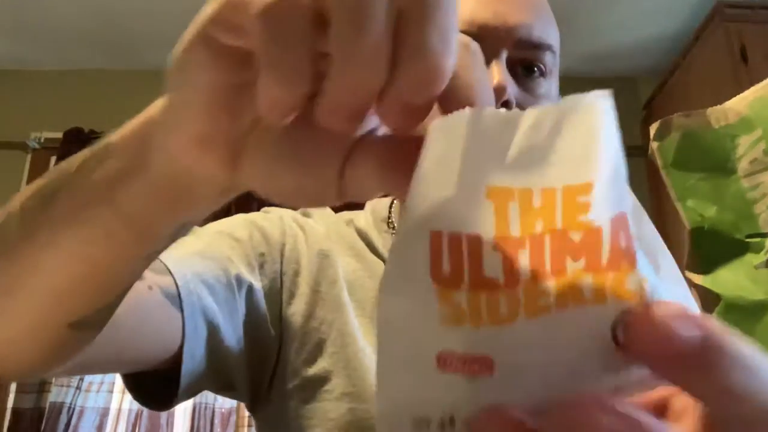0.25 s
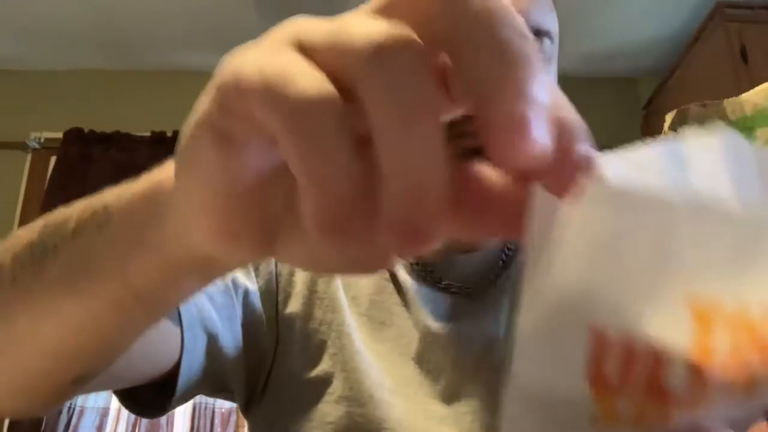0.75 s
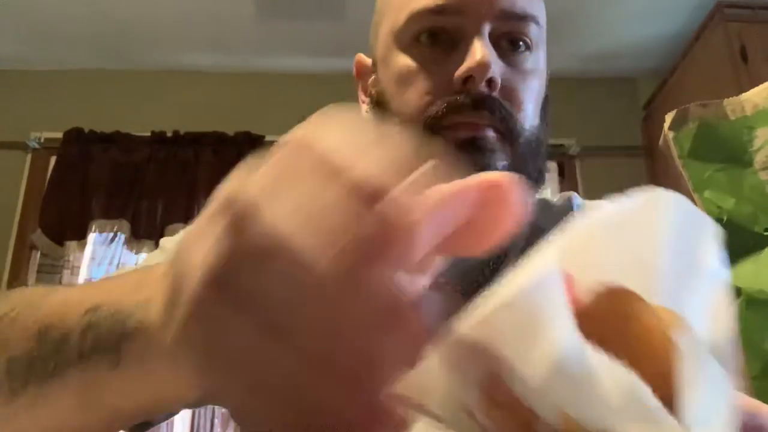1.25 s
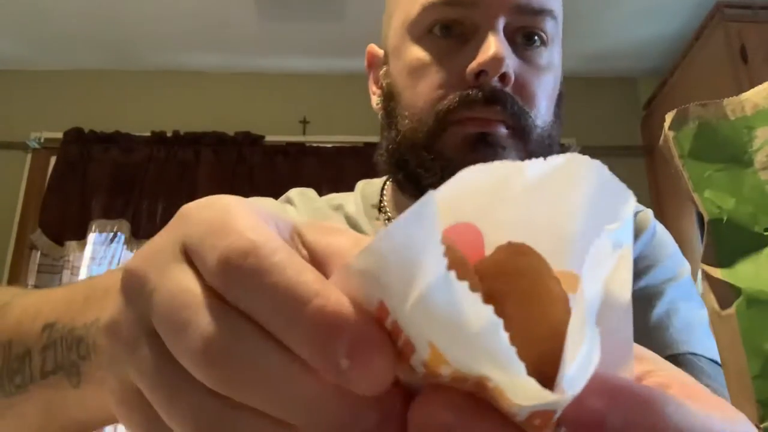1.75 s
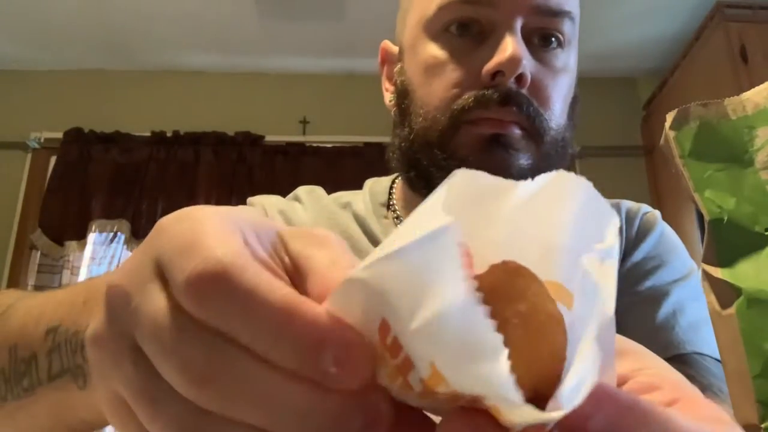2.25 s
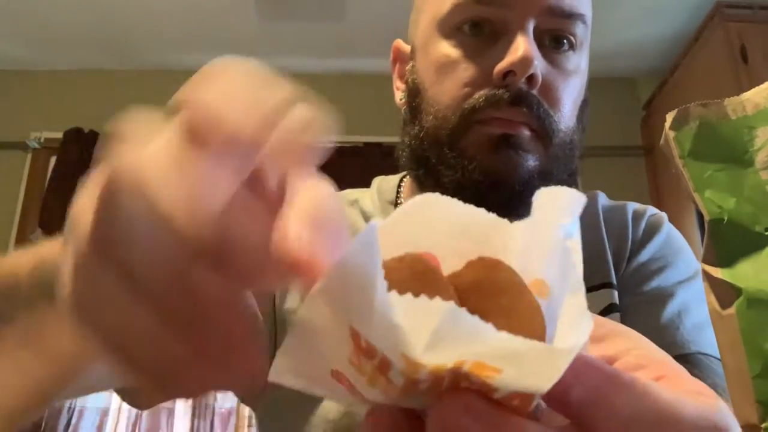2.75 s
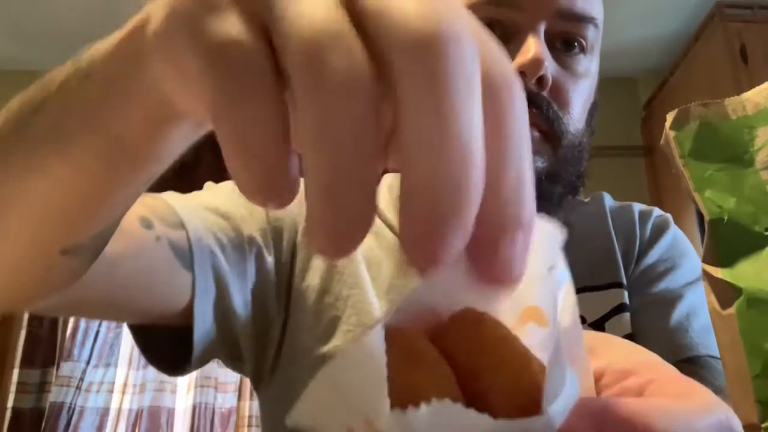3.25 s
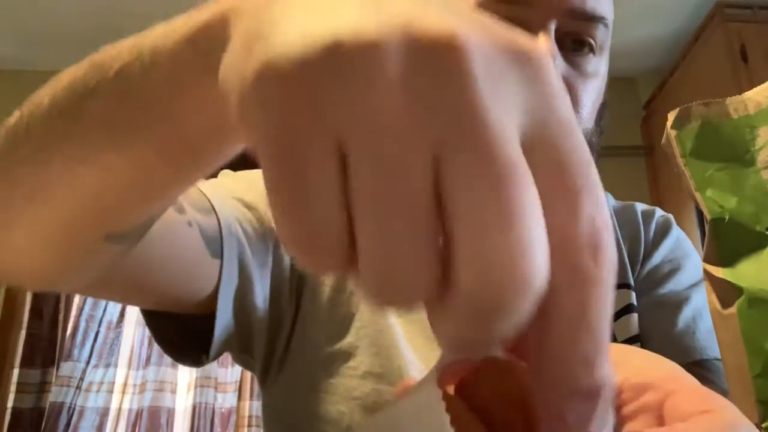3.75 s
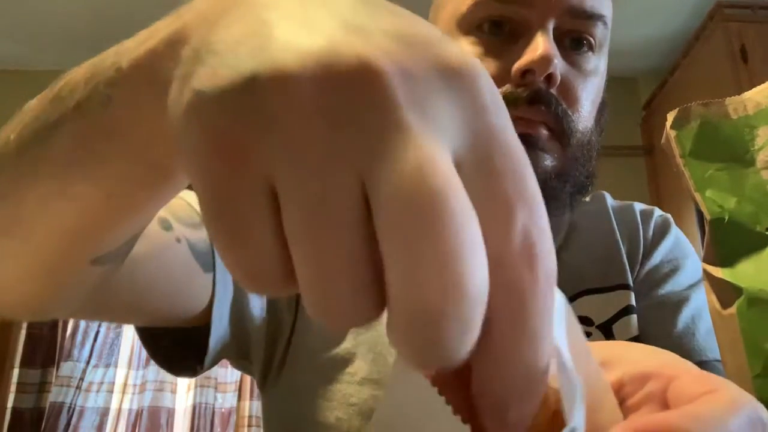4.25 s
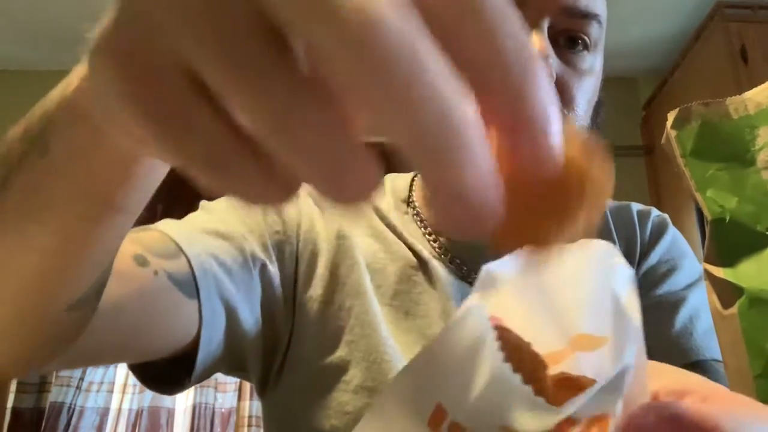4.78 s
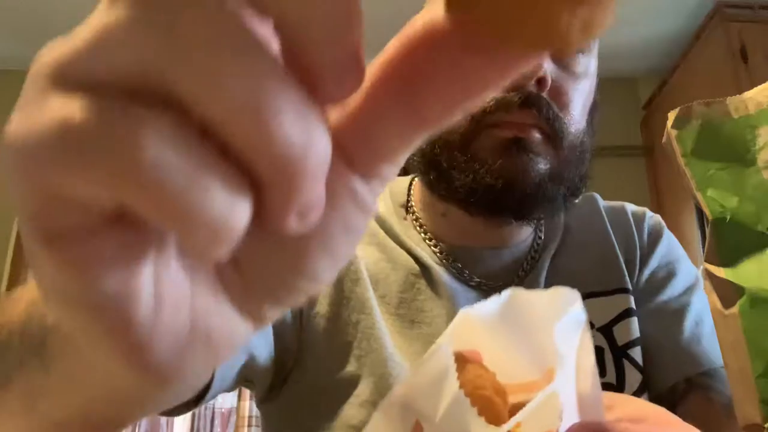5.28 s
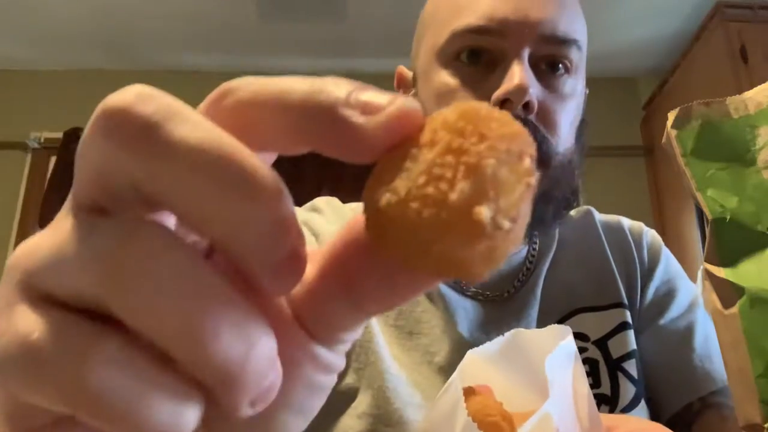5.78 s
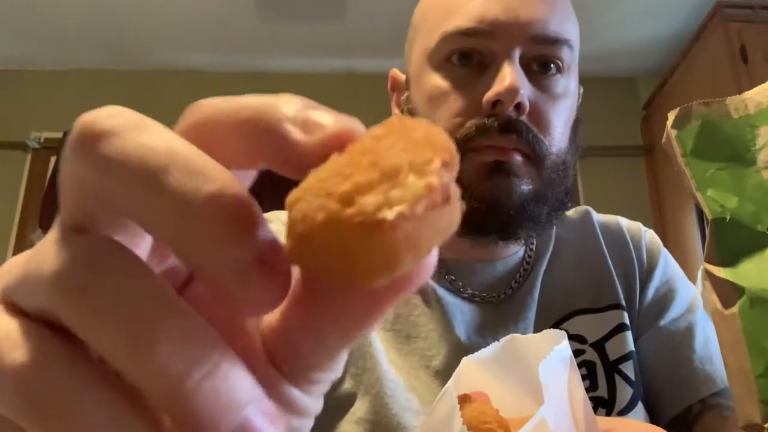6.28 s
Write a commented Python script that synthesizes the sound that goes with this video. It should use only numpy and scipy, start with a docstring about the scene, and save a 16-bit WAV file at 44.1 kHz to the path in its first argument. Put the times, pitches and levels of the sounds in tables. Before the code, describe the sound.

Close stereo sound of a small, thin paper food bag handled in a small, fairly dry room with a soft low air rush. From 0 to 1.1 s, bright creases snap and crackle rapidly, strongest around 0.2-0.4 and 0.8-1.1 s, with soft hollow thuds as the bag's walls flip. Around 1.2-1.5 s it nearly stops; scattered snaps follow from 1.5, with a sharp one near 2.0 and a dense flurry at 2.5-2.7 s. From 2.8 to 3.4 s the crinkling is lighter and crisp. Fingers dig in at 3.4-4.6 s, adding dull, small scratches, sliding paper and another bright run at 4.2-4.6 s. A last crease and muted thud come near 5.05 s, with faint brushing until about 5.4 s. Then near-stillness: barely audible ticks around 6.2-6.4 s and a deep appliance hum, swelling from 5.4 s and sinking slightly in pitch to the end at about 6.5 s.

```python
"""Paper rasps and creases snap as a small paper food bag is pulled open by hand, close to two ports in a small room.
Snaps are shaped noise bursts with facet rings; rubbing is crackle grains over hiss, with a dull handling rumble.
Wall flaps are soft low thuds of decaying sines; digging fingers are short rings near 900 Hz.
A low appliance hum, faint steady tones and filtered room noise lie underneath; the hum swells late."""
import sys
import numpy as np
from scipy import signal
from scipy.fft import rfft, irfft, next_fast_len
from scipy.io import wavfile
from scipy.ndimage import map_coordinates

SR = 44100
rng = np.random.default_rng(int(sys.argv[2]) if len(sys.argv) > 2 else 0)


def generate_wav(signal):
    """Clip the signal to [-1, 1] and save it as 16-bit WAV at the path in sys.argv[1]."""
    frames = np.transpose(np.atleast_2d(signal))
    scaled = np.clip(frames, -1, 1) * 32767
    pcm = np.round(scaled).astype(np.int16)
    wavfile.write(sys.argv[1], SR, pcm)


N = 287532

# main creases buckling, before trims: [t/s, rasp level over first 4.5 ms/dB, body re rasp/dB,
# crisp re rasp/dB, main facet f/Hz]
MAIN_CREASES = [(0.033, -27.5, 1, 6.5, 1670), (0.0437, -36.5, -2, -1.5, 1464), (0.0639, -28.5, 2, 6.5, 945),
                (0.0718, -25, -1, -2.5, 3860), (0.1225, -30.5, 0, -11.5, 2000), (0.1601, -33, 2, 0.5, 2430),
                (0.181, -30.5, -7.5, -1, 3402), (0.1937, -32.5, -4.5, 1, 2239),
                (0.2279, -20.5, -9, 2, 2230), (0.2514, -33, -27, -7.5, 3120), (0.27, -29, -12.5, -4, 4100),
                (0.3249, -20, -9, 1.5, 3100), (0.3574, -27, -5.5, 1.5, 3145), (0.4116, -15, -7.5, -1, 4070),
                (0.436, -26, -5.5, -9.5, 2240), (0.5582, -31, -3, 3, 3320),
                (0.6558, -27, -9.5, -10.5, 3860), (0.6907, -40.5, -4, -2, 955),
                (0.701, -29.5, -1.5, -8.5, 2040), (0.7894, -27, -15, -0.5, 3450),
                (0.7957, -20.5, -12, -1.5, 4260), (0.813, -18.5, -18.5, -4, 3400),
                (0.824, -31, -12, -2.5, 2280), (0.8562, -25, -10, -1, 2280), (0.9209, -28, -27, -15, 4830),
                (0.9877, -24, -28, -6.5, 2730), (0.9946, -35.5, -23, -10, 6100),
                (1.0534, -31, -8, -8.5, 2880), (1.0608, -18, -21, -5.5, 2820),
                (1.0748, -20, -11.5, -1.5, 3170), (1.0823, -17.5, -9.5, -9.5, 4530),
                (1.161, -37.5, 0.5, -20, 785), (1.2358, -36, -12, 5, 4470), (1.5131, -33, -29, 7.5, 2300),
                (1.5257, -37, -14, -4, 3280), (1.549, -30, -5, -1.5, 3650), (1.6002, -31.5, -6, 0, 4200),
                (1.6893, -30.5, -2, -5.5, 2210), (1.6955, -25.5, -7, 8.5, 2250),
                (1.7719, -22.5, -16, -7.5, 2160), (1.775, -29.5, -17, 10.5, 3420),
                (1.8705, -32, -9, -19, 2570), (1.9272, -40, -26, -3, 4060), (2.0238, -19, -14, -3, 3170),
                (2.0316, -25, -13.5, 0, 2770), (2.0506, -36, -0.5, -6.5, 1560),
                (2.1027, -38, -6.5, 8, 2830), (2.1224, -26, -10, 1.5, 4000), (2.2424, -31.5, -5.5, 0, 5660),
                (2.2493, -37.5, -26.5, 6, 6500), (2.284, -27.5, -29.5, 1.5, 1890), (2.295, -38, -3, 9, 818),
                (2.3107, -30.5, 0.5, -0.5, 2250), (2.3374, -43.5, 2.5, -6.5, 1210),
                (2.373, -32.5, -4.5, -1, 1390), (2.3955, -29.5, -6, 5, 4000),
                (2.4822, -29.5, -2, -1.5, 3700), (2.4889, -35, -6, 0, 6202), (2.528, -37.5, 0, -9, 825),
                (2.537, -21.5, -24, -1.5, 1880), (2.5407, -17.5, -8.5, 3, 1956), (2.5489, -25, -4, 5, 3470),
                (2.5691, -22, -5.5, 5.5, 6300), (2.5852, -32, -9.5, -1, 2470),
                (2.6145, -34.5, -1, 6.5, 4090), (2.6468, -22.5, -4, 5.5, 3770),
                (2.6655, -30.5, -6.5, 2.5, 730), (2.7589, -33, -1.5, 9, 870), (2.83, -30.5, -6, 2.5, 1540),
                (2.8424, -33, -5.5, 3, 3560), (2.8875, -37, -5, 9, 4540), (2.9179, -28.5, -4.5, -2.5, 2460),
                (2.9425, -34, -14, 3.5, 2330), (2.9656, -29, -2, 0.5, 2230),
                (2.9771, -36.5, -8, -2.5, 4565), (3.022, -31, -5.5, 2, 3580),
                (3.0354, -32, -19, -10.5, 4393), (3.055, -36, -24, 1.5, 3600), (3.1229, -36, -6, 5, 3280),
                (3.1621, -33, -15, 2, 5030), (3.1869, -41.5, -21, 6.5, 4160), (3.2185, -33, -15, 8.5, 5730),
                (3.2267, -28.5, -8, 9, 4810), (3.2475, -39.5, -11, 4.5, 4307), (3.2618, -28, -2, 2.5, 980),
                (3.2754, -31.5, -0.5, 1, 991), (3.284, -31.5, -7, 6.5, 6100), (3.4034, -25, -7, 5, 5500),
                (3.4391, -38, -9, 8, 5100), (3.4634, -33, -9, -2, 1930), (3.4725, -36.5, 5.5, -10.5, 1095),
                (3.4913, -23.5, -5.5, 5.5, 4200), (3.5071, -35, -13, -4.5, 3730),
                (3.6671, -32.5, -4.5, -0.5, 1550), (3.6728, -22.5, -30, 2.5, 4120),
                (3.7407, -30, -12, -17.5, 3100), (3.7581, -31, -5, 6, 1120), (3.8112, -34, -13, -2.5, 3359),
                (3.8425, -23.5, -6.5, -6, 2270), (3.875, -37.5, 0, -16.5, 2880),
                (3.908, -49.5, 11.5, -23, 1120), (3.9626, -31, -12.5, -5, 2700),
                (3.9728, -31.5, -5, -11.5, 2920), (4.0577, -31.5, 3, 7, 1000), (4.0657, -32, -1.5, 2, 1060),
                (4.1153, -29, 2.5, 3, 890), (4.163, -30, -3.5, 0.5, 2600), (4.1674, -26.5, -6, 2, 910),
                (4.245, -35.5, -16, 0, 3620), (4.2959, -24.5, -6.5, 5.5, 3770), (4.394, -28.5, -9, 8, 5900),
                (4.4219, -21.0, -24.5, 2.5, 4080), (4.4346, -32, -9, -4, 2400),
                (4.501, -30.5, -19, 1, 4800), (4.5251, -26, -13, -1, 4090), (4.537, -24.5, -6.5, 2.5, 3400),
                (4.6124, -42, 0, 5.5, 861), (4.6827, -32.5, -10, -12, 2640), (4.7568, -38.5, 0, -6, 734),
                (4.799, -37.5, -21, -5.5, 4410), (5.0445, -28.5, -5.5, -4, 836),
                (5.1401, -55.5, 17, -22, 840), (5.226, -58, -6, 6.5, 6500), (5.258, -44, -18, -16, 3335),
                (5.3688, -53, -3, -12.5, 1660), (6.166, -47.5, -3.5, -23, 1453),
                (6.1944, -56.5, 0, -10, 900), (6.358, -44.5, -17, -18.5, 3630)]
# bag wall flaps: [t/s, peak level before trim/dB, nominal settled f/Hz]
WALL_FLAPS = [(0.229, -21.5, 235), (0.411, -19.5, 546), (0.414, -22, 384), (0.56, -25.5, 680),
              (1.078, -29.5, 278), (1.096, -31.5, 86.5), (1.696, -28.5, 313), (1.775, -24.5, 408),
              (2.052, -27, 220), (2.12, -34, 176), (2.31, -28.5, 216), (2.484, -28, 394),
              (2.648, -28.5, 510), (2.653, -29.5, 124), (2.666, -33, 557), (2.761, -29.5, 354),
              (2.971, -26, 126), (3.264, -24, 198), (3.598, -29.5, 196), (3.675, -33.5, 229),
              (5.046, -34.5, 278)]
# modes of a bag wall: [frequency ratio, level/dB]
WALL_MODES = [(1, 1), (.66, -6.5), (1.55, -4), (2.2, -10), (3.3, -9.5)]
# paper registers, rows body, rasp, crisp: [low f/Hz, high f/Hz]
REGISTERS_HZ = [(420, 1543), (1400, 6040), (7400, 13760)]
# tone of thin paper: [f/Hz, gain/dB]
PAPER_TONE = [(300, -8), (900, -6.5), (1400, -5.5), (2000, 3.5), (3100, 4), (4100, 5), (5600, 0.5),
              (7800, -4), (10000, -1), (12000, -4), (14300, -2.5), (15400, 4.5), (16100, -8)]
# phase lead of left port over right: [f/Hz, phase/rad]
PORT_LEAD = [(0, 0), (500, .6), (1300, .6), (2000, 1.4), (3000, 2.7), (4200, 2.8), (6600, 4.8), (7600, 3.8),
             (8400, 3.14), (9500, 2.4), (10300, 1.55), (11200, .8), (12500, 0), (13500, -.55),
             (15300, -2.3)]
# left-right likeness of paper sound: [f/Hz, coherence/0-1]
PORT_LIKENESS = [(200, 0.1), (500, 0), (1000, 0.68), (3000, 0.26), (5300, 0.29), (8000, 0.99), (12500, 1),
                 (16000, 0.6)]
# fingers crumple or drag the paper, before trims: [t/s, hold/s, rasp level/dB, crisp re rasp/dB]
STROKES_RASP = [(0.04, 0.033, -40, -4), (0.141, 0.1, -38, 3.5), (0.338, 0.022, -43, 1.5),
                (0.406, 0.045, -38, 2.5), (0.646, 0.014, -43, 0.5), (0.781, 0.042, -31, -14.5),
                (0.965, 0.013, -42, -4.5), (1.048, 0.02, -30.5, -5.5), (1.49, 0.063, -52, 0.5),
                (1.787, 0.021, -47, -14), (2.148, 0.15, -50, 6), (2.28, 0.019, -33.5, 0),
                (2.528, 0.047, -33.5, -5), (2.616, 0.023, -35.5, -1.5), (2.929, 0.057, -41, -1),
                (3.071, 0.036, -48, 3), (3.257, 0.055, -37, 2.5), (3.442, 0.016, -37, 1),
                (3.479, 0.015, -36.5, -6.5), (3.655, 0.017, -38.5, -9.5), (4.049, 0.014, -37, -2),
                (4.154, 0.02, -36, -2.5), (4.274, 0.051, -35.5, -3.5), (4.375, 0.028, -34, 7.5),
                (4.426, 0.17, -39.5, -2), (4.503, 0.035, -35, -5), (4.672, 0.073, -40.5, -1),
                (5.125, 0.025, -46.5, -20), (6.167, 0.18, -64.5, -17)]
# steady sliding under the holding hands, before trims: [t/s, rasp level/dB]
SLIDING_RASP = [(0, -48), (.1, -39.5), (.4, -50), (.53, -51), (.75, -56.5), (.87, -50.5), (1.14, -49),
                (1.21, -58.5), (1.93, -56.5), (2.37, -49), (2.79, -53.5), (3.36, -53.5), (3.62, -44.5),
                (3.85, -45.5), (3.95, -54.5), (4.6, -43), (4.76, -53.5), (4.9, -75.5)]
# fingers dig in the open bag: [t/s, hold/s, level/dB]
FINGER_DIGS = [(3.433, 0.41, -50.5), (4.05, 0.056, -44), (4.29, 0.3, -46.5), (5.129, 0.016, -54)]
# appliance hum before flutter: [t/s, rms level/dB]
HUM_LEVEL = [(2.6, -82), (3.0, -58), (3.7, -69), (3.9, -51.5), (4.9, -65), (5.35, -57), (5.55, -50),
             (6.0, -45.5)]
# appliance hum before wander, sinking a little: [t/s, f/Hz]
HUM_FREQUENCY = [(5.2, 49.6), (5.9, 48.3), (6.5, 47.2)]
# faint steady tones above the hum: [f/Hz, rms level/dB], before wander and flutter
FAINT_TONES = [(172.3, -65), (226.1, -66), (339.1, -72.5)]
# spectrum of the room's low rush: [f/Hz, gain/dB]
AIR_TONE = [(20, -26.5), (45, -7), (90, 2), (180, -5), (280, -2.5), (400, -7), (560, -17), (900, -20.5),
            (2000, -33.5), (4000, -56), (14000, -62.5)]
# room decay: [f/Hz, t60/s]
ROOM_T60 = [(150, 0.29), (1000, 0.16), (4000, 0.23), (14000, 0.11)]

FACET_HZ = 2358  # usual ring of a paper facet
TOP_HZ = 16600
SMALL_CREASES_END_S = 4.8
STROKE_RISE_DB_PER_S, STROKE_FALL_DB_PER_S = 1402, 330.5
DIG_RISE_DB_PER_S, DIG_FALL_DB_PER_S = 291, 82
# harder rubbing is brighter: (offset/dB at the usual rasp level, slope/dB per dB of rasp)
USUAL_RASP_DB, BODY_LAW, CRISP_LAW = -46.5, (-3.5, 0.74), (-2.4, 1.3)
# soft brushing as the hand lifts the food away
BRUSH_S, BRUSH_HOLD_S, BRUSH_DB, BRUSH_CRISP_DB = 5.025, 0.36, -57.5, -5.5
BRUSH_RISE_DB_PER_S, BRUSH_FALL_DB_PER_S = 220, 45


def amp(db):
    """Decibels to gain."""
    return 10 ** (np.asarray(db) / 20)


def unit(x):
    """Scale to rms 1."""
    return x / np.sqrt(np.mean(x ** 2) + 1e-20)


def along(points, hz):
    """Interpolate (f/Hz, value) points on a log frequency axis."""
    f, value = np.transpose(points)
    return np.interp(np.log(hz + 1), np.log(f + 1), value)


def curve(rows):
    """Interpolate (t/s, value) rows to one value per sample."""
    s, value = np.transpose(rows)
    return np.interp(np.arange(N) / SR, s, value)


def wobble(knots_per_s):
    """Smooth random curve through normally distributed knots."""
    knots = rng.standard_normal(int(N * knots_per_s / SR) + 4)
    return map_coordinates(knots, [np.arange(N) * knots_per_s / SR])


def filtered(x, response):
    """Apply a complex response of frequency to x."""
    n = x.shape[-1]
    m = next_fast_len(n + n // 8)
    return irfft(rfft(x, m) * response(np.fft.rfftfreq(m, 1 / SR)), m)[..., :n]


def band(x, low_hz, high_hz, order=3):
    """Causal Butterworth band-pass."""
    edges = [low_hz, min(high_hz, SR / 2 - 1)]
    return signal.sosfilt(signal.butter(order, edges, 'band', fs=SR, output='sos'), x)


def add(track, s, sound):
    """Mix a sound into the track at s seconds."""
    i = max(round(s * SR), 0)
    part = track[..., i:i + sound.shape[-1]]
    part += sound[..., :part.shape[-1]]


def widened(mid, side, width):
    """Left and right from a common signal and a smaller opposed one."""
    return np.array([mid + width * side, mid - width * side])


def at_ports(pair, lag_s=0):
    """Turn two unrelated signals into paper sound at two ports, partly alike and phase-shifted."""
    def split(hz):
        turn = np.arccos(np.clip(along(PORT_LIKENESS, hz), 0, 1)) / 2
        return amp(along(PAPER_TONE, hz)) * [np.cos(turn), np.sin(turn)]

    def phase(hz):
        lead = along(PORT_LEAD, hz) + 2 * np.pi * hz * lag_s
        return np.exp(.5j * np.outer([1, -1], lead))

    mid, side = filtered(pair, split)
    return filtered(np.array([mid + side, mid - side]), phase)


def grains(rate_per_s, centre_hz, scatter, cycles, spread_db):
    """Two unrelated trains of tiny damped rings of random pitch and size; rms 1."""
    count = max(int(rate_per_s * N / SR), 1)
    start, pitch, size, side = rng.random((count, 4)).T[:, :, None]
    t = np.arange(int(SR * min(cycles / centre_hz, .03))) / SR
    hz = np.minimum(centre_hz * np.exp(scatter * (2 * pitch - 1)), SR / 2.5)
    height = amp(spread_db * np.minimum(-np.log(1 - size), 4)) * np.sqrt(hz)
    decay = np.exp(-np.log(1000) * hz / cycles * t)  # 60 dB in the given cycles
    rings = height * decay * np.sin(2 * np.pi * hz * t)
    where = (start * (N - len(t))).astype(int) + np.arange(len(t)) + N * (side > .5)
    return unit(np.bincount(where.ravel(), rings.ravel(), 2 * N).reshape(2, N))


def gesture(start_s, hold_s, rise_db_per_s, fall_db_per_s):
    """Rise, top and fall of one movement, in dB below its top."""
    t = np.arange(N) / SR - start_s
    return np.minimum(np.minimum(rise_db_per_s * t, fall_db_per_s * (hold_s - t)), 0)


def patchy(x, depth_db):
    """Vary the level smoothly at random over time and frequency; rms 1."""
    z = signal.stft(x, nperseg=512)[2]
    blur = np.outer(np.hanning(7), np.hanning(9))
    field = signal.fftconvolve(rng.standard_normal(z.shape[1:]), blur, 'same')
    return unit(signal.istft(z * amp(depth_db * unit(field)), nperseg=512)[1][:, :N])


def background(air_db=-57, width=0.61):
    """Slowly wandering sines for the hum and faint tones, over noise shaped as the room's low rush."""
    def tone(hz, db):
        phase = 2 * np.pi * np.cumsum(hz + 0.15 * wobble(3.4)) / SR
        return np.sqrt(2) * np.sin(phase) * amp(db + 1.1 * wobble(9))

    hum = tone(curve(HUM_FREQUENCY), curve(HUM_LEVEL))
    hum = hum + sum(tone(hz, db) for hz, db in FAINT_TONES)
    noise = patchy(rng.standard_normal((2, N)), depth_db=2.5)
    mid, side = filtered(noise, lambda hz: amp(along(AIR_TONE, hz)))
    air = unit(widened(mid, side, width) * amp(0.2 * wobble(8.9)))
    return hum + air * amp(air_db)


def rubbing():
    """Body, rasp and crisp levels in dB: the strongest of strokes, sliding and last brushing wins."""
    def follow(rasp_db, offset_db, slope):
        return USUAL_RASP_DB + offset_db + slope * (rasp_db - USUAL_RASP_DB)

    sliding_db = curve(SLIDING_RASP)
    brush = gesture(BRUSH_S, BRUSH_HOLD_S, BRUSH_RISE_DB_PER_S, BRUSH_FALL_DB_PER_S)
    rasp_db = np.maximum(sliding_db, BRUSH_DB + brush)
    brush_crisp_db = BRUSH_DB + BRUSH_CRISP_DB + CRISP_LAW[1] * brush
    crisp_db = np.maximum(follow(sliding_db, *CRISP_LAW), brush_crisp_db)
    for s, hold_s, db, crisp_re_rasp_db in STROKES_RASP:
        stroke_db = db + gesture(s, hold_s, STROKE_RISE_DB_PER_S, STROKE_FALL_DB_PER_S)
        rasp_db = np.maximum(rasp_db, stroke_db)
        crisp_db = np.maximum(crisp_db, stroke_db + crisp_re_rasp_db)
    return follow(rasp_db, *BODY_LAW), rasp_db, crisp_db


def rustle(levels_db, slide=0.73, trims_db=(-1.5, -2.5, 0), still_db=-57):
    """Tiny creases crackle over sliding hiss; at low rasp levels smooth hiss dominates."""
    moving = np.clip((levels_db[1] - still_db) / 10, .04, 1)
    crackle = grains(rate_per_s=2400, centre_hz=2698, scatter=1.64, cycles=18, spread_db=2.0)
    hiss = rng.standard_normal((2, N))
    # the sheets catch and let go, so the sound comes in clumps
    clumps = unit(amp(3.0 * wobble(170) + 2.4 * wobble(45)))
    scrape = unit((crackle + slide * hiss) * clumps)
    smooth = rng.standard_normal((2, N))
    sheet = at_ports(np.sqrt(moving) * scrape + np.sqrt(1 - moving) * smooth)
    out = np.zeros((2, N))
    for edges, level_db, trim_db in zip(REGISTERS_HZ, levels_db, trims_db):
        out += unit(band(sheet, *edges)) * amp(level_db + trim_db)
    return out


def handling(body_db, level_db=-7, lump_db=7, most_db=-43, width=0.11, steadied_s=3.8, steadied_db=-3.0):
    """Moving hands shake the bag: lumpy low noise follows the rubbing, less once it lies in the palm."""
    mid, side = band(rng.standard_normal((2, N)), 140, 410, order=2)
    steadied = curve([(steadied_s - .1, 0), (steadied_s, steadied_db)])
    lumps = lump_db * np.tanh(wobble(25))
    shake_db = np.minimum(body_db, most_db) + level_db + steadied + lumps
    return unit(widened(mid, side, width)) * amp(shake_db)


def creases(rasp_db, over_db=6, most_db=-39, least_db=-55,
            body_db=-4, crisp_db=1, tint_db=2.0, pitch_spread=0.6, count=64):
    """Main crease rows, plus small ones at random times where the rubbing is hard enough."""
    rows = list(MAIN_CREASES)
    for s in rng.random(count) * SMALL_CREASES_END_S:
        body, crisp, pitch = rng.standard_normal(3)
        rub_db = rasp_db[int(s * SR)]
        if rub_db > least_db:
            rows.append((s, min(rub_db + over_db, most_db), body_db + tint_db * body,
                         crisp_db + tint_db * crisp, FACET_HZ * np.exp(pitch_spread * pitch)))
    return rows


def ripple(depth_db, size=72):
    """Random blunt peaks and deeper dips, as a gain of frequency."""
    gain_db = depth_db * np.minimum(rng.standard_normal(size), 1.2)
    points = np.column_stack([np.geomspace(300, SR / 2, size), gain_db])
    return lambda hz: amp(along(points, hz))


def snaps(rows, count=5):
    """A crease pops through: a faint noise swell, then a kick, ms of flutter, and facets ringing."""
    t60s_s, trims_db = (.02, .011, .007), (0, -.5, -.5)  # body, rasp, crisp
    facet_t60_s, facet_spread = 0.016, 0.76  # t60 at FACET_HZ; spread in log frequency
    tail_db, tail_t60_s = -27, 0.16
    rise_s, kick, kick_life_s = 0.00016, 3, 0.0001
    lead_in_db, lead_in_time_s = -21, 0.0027
    colour_db, lag_spread_s = 5.5, .000004
    gains = np.r_[0.66, np.full(count, 0.17)]  # main facet, neighbours

    out, pad = np.zeros((2, N)), SR // 160
    clock = (np.arange(SR // 16) - pad) / SR
    t = np.maximum(clock, 0)
    head = slice(pad, pad + 200)  # first 4.5 ms sets the level
    onset = 1 - np.exp(-t / rise_s)
    lead_in = amp(lead_in_db) * np.exp(-np.abs(clock) / lead_in_time_s)
    for s, db, body_db, crisp_db, main_hz in rows:
        # one facet rings out over neighbours of other sizes
        neighbours_hz = FACET_HZ * np.exp(facet_spread * rng.standard_normal(count))
        hz = np.minimum(np.r_[main_hz, neighbours_hz], SR / 3)[:, None]
        decay = amp(-60 * t / facet_t60_s * np.sqrt(hz / FACET_HZ))
        ring = gains @ (np.sin(2 * np.pi * (hz * t + rng.random(hz.shape))) * decay)
        noise = rng.standard_normal((2, len(t)))
        # every fold radiates with its own lag and colour
        lag_s, colour = lag_spread_s * rng.standard_normal(), ripple(colour_db)
        levels_db = (db + body_db, db, db + crisp_db)
        for edges, t60_s, level_db, trim_db in zip(REGISTERS_HZ, t60s_s, levels_db, trims_db):
            flutter = kick * np.exp(-t / kick_life_s) + amp(-60 * t / t60_s)
            flutter = flutter + amp(tail_db - 60 * t / tail_t60_s)
            pop = noise * (lead_in + onset * flutter) + onset * ring * [[1], [0]]
            pop = band(filtered(at_ports(pop, lag_s), colour), *edges)
            head_rms = np.sqrt(np.mean(pop[:, head] ** 2))
            add(out, s - pad / SR, pop * amp(level_db + trim_db) / head_rms)
    return out


def flaps(cycles=9, rise_s=0.0007, level_db=-1, tension=0.22, relax_s=0.0041):
    """A bag wall flips over with a firm knock; its modes ring a few cycles, sinking as it slackens."""
    out, t = np.zeros(N), np.arange(SR // 4) / SR
    sag = t + tension * relax_s * (1 - np.exp(-t / relax_s))  # pitch starts high by the tension
    for s, db, hz in WALL_FLAPS:
        ring = np.zeros(len(t))
        for ratio, mode_db in WALL_MODES:
            decay = amp(mode_db - 60 * t * hz * np.sqrt(ratio) / cycles)
            mode_hz = hz * ratio * rng.normal(1, 0.033)
            ring += decay * np.sin(2 * np.pi * (mode_hz * sag + rng.random()))
        ring *= 1 - np.exp(-t / rise_s)
        add(out, s, amp(db + level_db) * ring / np.abs(ring).max())
    return out


def digging():
    """Fingers and crumbed food scratch inside the bag: short damped rings near 900 Hz."""
    scratches = grains(rate_per_s=700, centre_hz=900, scatter=.28, cycles=16, spread_db=3.3)
    digs_db = [db + gesture(s, hold_s, DIG_RISE_DB_PER_S, DIG_FALL_DB_PER_S)
               for s, hold_s, db in FINGER_DIGS]
    return unit(at_ports(scratches)) * amp(np.max(digs_db, axis=0))


def room(x, wet_db=-15):
    """Nearby walls answer: convolution with decaying noise, lows lasting longest and the top least."""
    _, t, z = signal.stft(rng.standard_normal((2, SR // 2)), SR, nperseg=256)
    t60_hz = np.fft.rfftfreq(256, 1 / SR)
    decay = amp(-60 * t / along(ROOM_T60, t60_hz)[:, None])
    tail = signal.istft(z * decay, SR, nperseg=256)[1]
    tail[:, :SR // 200] = 0  # 5 ms before the first reflection
    wet = signal.fftconvolve(x, tail / np.linalg.norm(tail[0]), axes=1)[:, :N]
    tone = [(500, 1.0), (3000, 3.5), (12000, -16.0)]  # f/Hz, gain/dB
    return amp(wet_db) * filtered(wet, lambda hz: amp(along(tone, hz)))


def scene():
    """Bag a little to the left with its room reflections; background a little to the right."""
    body_db, rasp_db, crisp_db = rubbing()
    floor = background() * amp([[-.9], [.9]])
    bag = rustle((body_db, rasp_db, crisp_db)) + handling(body_db)
    bag = bag + snaps(creases(rasp_db)) + flaps() + digging()
    bag = bag * amp([[.4], [-.4]])
    return bag + room(bag) + floor


def record(dry):
    """The microphone rounds off the hardest peaks and has a steep band limit."""
    sound = dry / (1 + np.abs(dry / .95) ** 6) ** (1 / 6)
    return filtered(sound, lambda hz: hz < TOP_HZ)


dry = scene()
out = record(dry)
generate_wav(out)
```